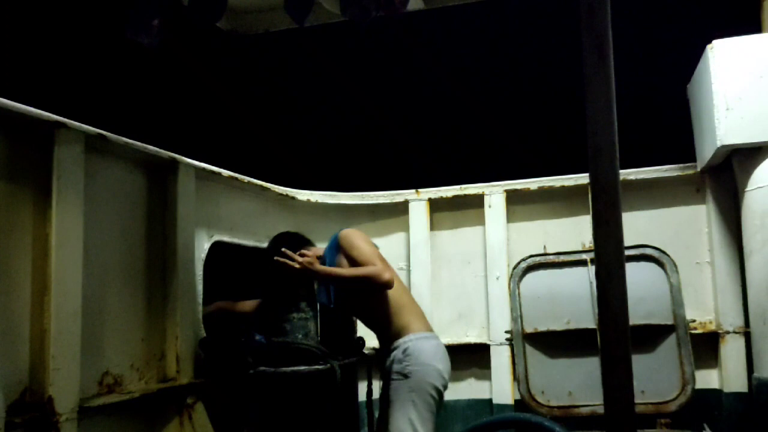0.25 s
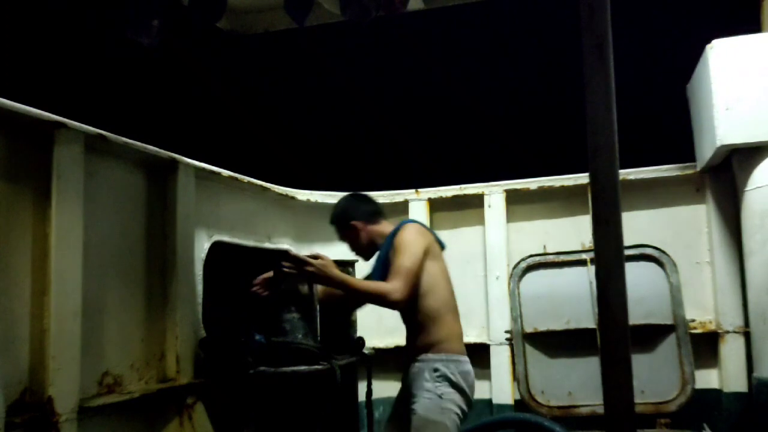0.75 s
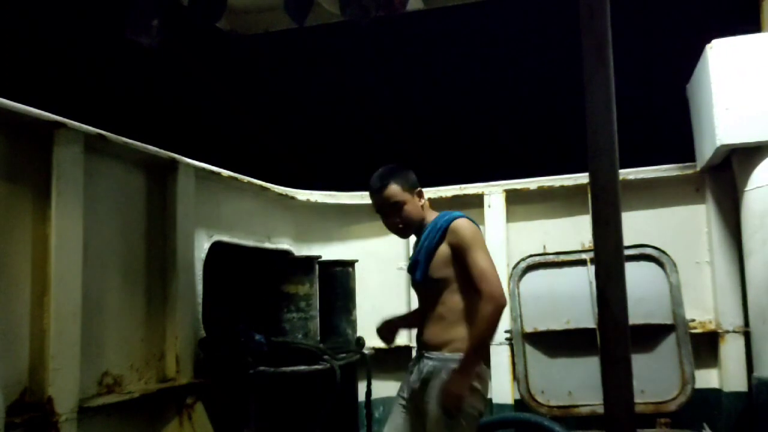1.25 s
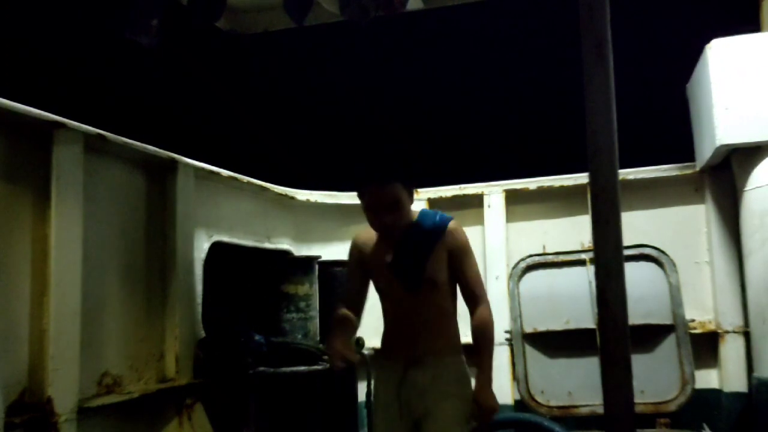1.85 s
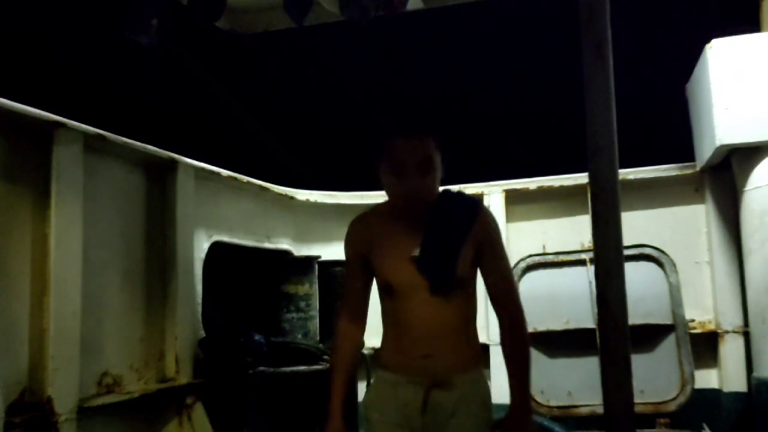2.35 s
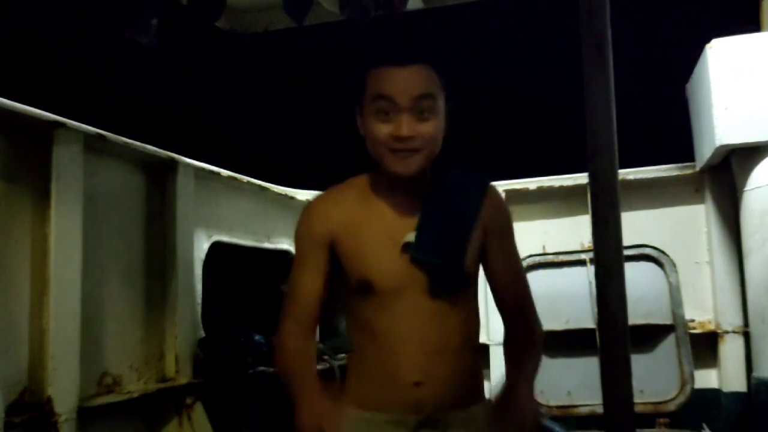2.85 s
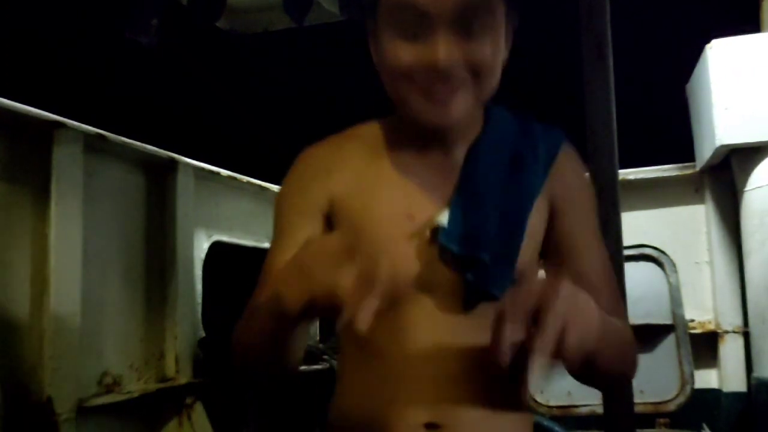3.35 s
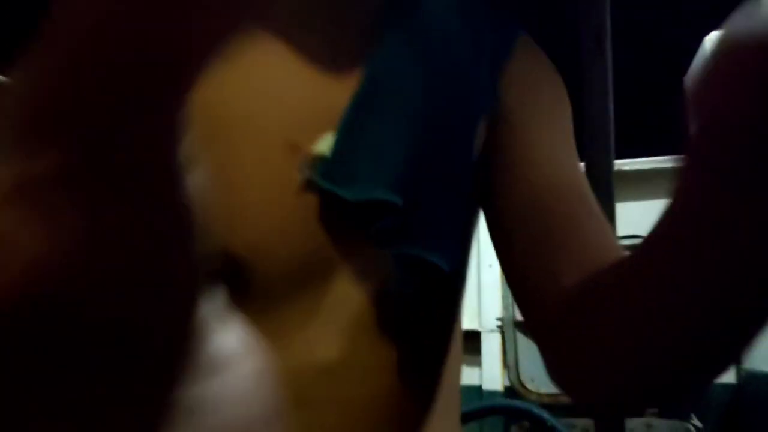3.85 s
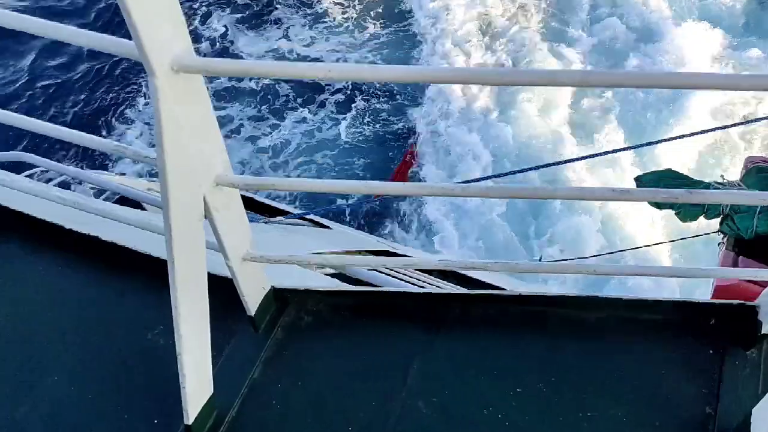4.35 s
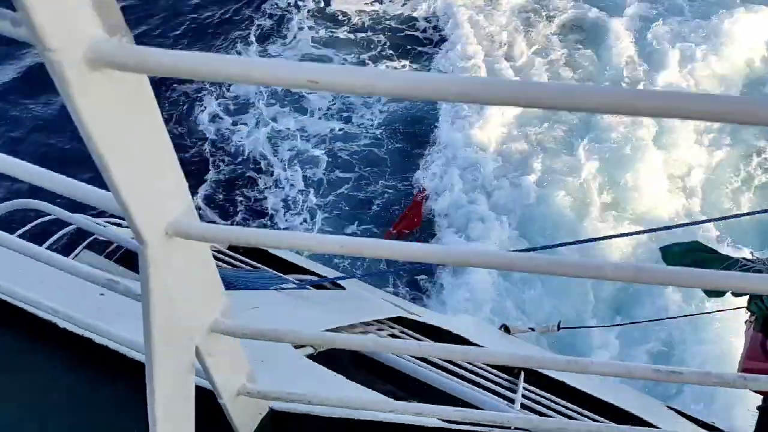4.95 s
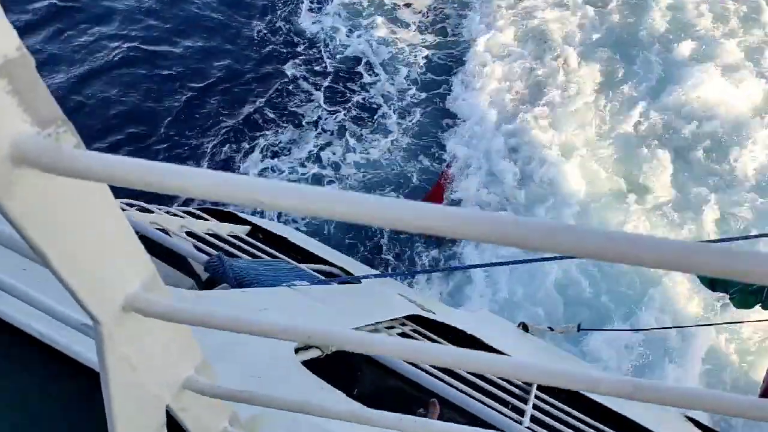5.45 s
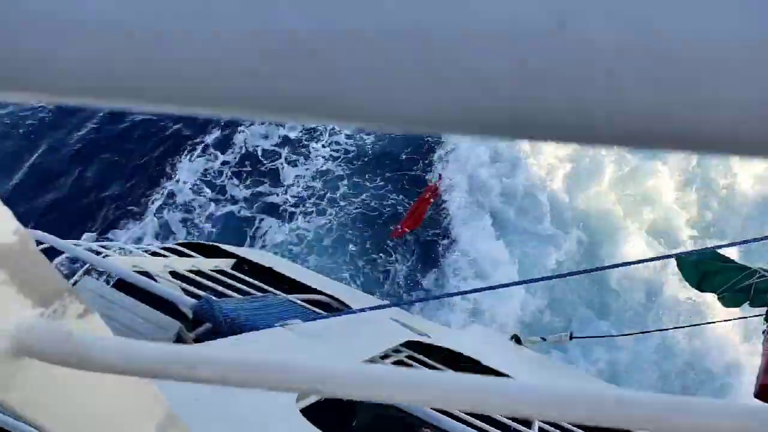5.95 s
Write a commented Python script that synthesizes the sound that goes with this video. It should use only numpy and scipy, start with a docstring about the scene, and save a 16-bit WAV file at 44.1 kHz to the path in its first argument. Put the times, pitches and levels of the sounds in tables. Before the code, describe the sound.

Aboard a ship, twin diesel engines drone inside a steel deck shelter with a dense, boomy roar and an unsteady mid-pitched blower whine. After about four seconds a hard cut moves to an open rail, where the roar thins, the engine hum is steadier and clearer, and the wake hisses below. Stereo handheld microphone, loud and close throughout.

```python
"""On a ship: a steel deck shelter first, then, after a hard cut, the open rail above the wake.
Twin diesels drone as sines at multiples (orders) of two slightly different engine cycles, which beat.
Roar and hissing wake are random short-time spectra, shaped by place and shared in part by the two ports.
In the shelter a blower sings over the roar as unsteady tones."""
import sys
import numpy as np
from scipy import signal
from scipy.io import wavfile
from scipy.ndimage import uniform_filter1d

SR = 44100
rng = np.random.default_rng(int(sys.argv[2]) if len(sys.argv) > 2 else 0)


def inscribe(sig):
    """Save sig as 16-bit PCM at rate SR to the path in sys.argv[1].

    A 1-D sig is mono; a 2-D sig holds one channel per row.
    Samples are clipped to [-1, 1] before scaling.
    """
    pcm = np.round(np.clip(np.atleast_2d(sig).T, -1, 1) * 32767)
    wavfile.write(sys.argv[1], SR, pcm.astype(np.int16))


N = 272538

# cycle rates of first and second engine
SHELTER_CYCLE_HZ, RAIL_CYCLE_HZ = (12.066, 12.29), (12.0425, 12.1925)


def gain_of(db):
    """dB to amplitude."""
    return 10 ** (np.asarray(db) / 20)


def evened(x):
    """Scaled to rms 1."""
    return x / np.sqrt(np.mean(x ** 2) + 1e-20)


def drift(top_hz):
    """Slow random curve of about rms 1: sines of random phase up to top_hz, weaker as they quicken."""
    coarse_s = np.arange(0, N + 256, 256) / SR
    slow = sum(np.sin(2 * np.pi * (f * coarse_s + rng.random())) / np.sqrt(f)
               for f in top_hz * np.geomspace(.05, 1, 20))
    return np.interp(np.arange(N) / SR, coarse_s, evened(slow))


def curves(rows):
    """Each column of a time table, interpolated at every sample."""
    s, *columns = np.transpose(rows)
    return [np.interp(np.arange(N) / SR, s, column) for column in columns]


def turning(hz):
    """Turns made by the speed curve hz from a random start."""
    return np.cumsum(hz * np.ones(N)) / SR + rng.random()


def tone(turns, db, same, pan_db=0.):
    """A cosine of rms db in two ports; lower likeness shifts the right port's phase."""
    ports = gain_of([[pan_db / 2], [-pan_db / 2]])
    angle = 2 * np.pi * turns
    right_shift = np.arccos(np.clip(same, -1, 1))
    return np.sqrt(2) * gain_of(db) * ports * np.cos([angle, angle + right_shift])


def beating(hz, beat_hz, peak_s, db, other_db, same=1.0):
    """Two tones beat_hz apart that add up in step at peak_s."""
    turns, beats = turning(hz), np.cumsum(beat_hz * np.ones(N)) / SR
    beats -= beats[round(peak_s * SR)]
    return tone(turns, db, same=1.0) + tone(turns + beats, other_db, same)


def bump(hz, centre_hz, width_hz):
    """A rounded resonance peak of height 1 across the bins hz."""
    return 1 / (1 + (2 * (hz[:, None] - centre_hz) / width_hz) ** 2)


NOTCH_WIDTH_HZ, LIFT_SHARE, LIFT_BELOW_HZ, LIFT_WIDTH_HZ = 140, 0.32, 530, 640
LOW_ROAR_HZ, LOW_ROAR_WIDTH_HZ = 200, 84


def roar(shape, modes, likeness, hiss, patchy_db, speckle_db, flicker_db, hiss_from_hz,
         notch=((0, 1, 0),), low=((0, 0),)):
    """Broadband noise from random spectra with wide patches and narrow speckle, raised at the air modes."""
    frames, hz = N // 512 + 5, np.fft.rfftfreq(2048, 1 / SR)
    at = np.minimum(np.arange(frames) * 512, N - 1)
    a, b, c, d, patches, speckle = rng.standard_normal((frames, 1025, 6)).T
    patches = evened(uniform_filter1d(uniform_filter1d(patches, size=30, axis=0), size=4, axis=1))
    speckle = evened(uniform_filter1d(uniform_filter1d(speckle, size=3, axis=0), size=6, axis=1))

    # the right port shares part of the left port's noise
    same_hz, same = np.transpose(likeness)
    same = np.clip(np.interp(np.log(hz + 1), np.log(same_hz), same), -1, 1)[:, None]
    left, other = a + 1j * b, c + 1j * d
    z = np.array([left, same * left + np.sqrt(1 - same ** 2) * other])

    shape_hz, *shape_db = np.transpose(shape)
    ports_db = np.array([np.interp(np.log(hz + 1), np.log(shape_hz), db, left=-90) for db in shape_db])
    ports_db = ports_db[:, :, None] + sum(db * bump(hz, mode_hz, width_hz) for mode_hz, width_hz, db in modes)

    treble = (1 / (1 + (hiss_from_hz / (hz + 1)) ** 2))[:, None]
    hiss_db = (curves(hiss)[0] + flicker_db * drift(30.))[at]
    uneven_db = patchy_db * patches + np.sqrt(treble) * speckle_db * speckle
    z *= gain_of(ports_db + uneven_db + treble * hiss_db)

    # a moving notch, with the opposite change below it
    notch_hz, notch_db = (curve[at] for curve in curves(notch))
    notch_shape = bump(hz, notch_hz, NOTCH_WIDTH_HZ)
    notch_shape = notch_shape - LIFT_SHARE * bump(hz, notch_hz - LIFT_BELOW_HZ, LIFT_WIDTH_HZ)
    low_db = curves(low)[0][at] * bump(hz, LOW_ROAR_HZ, LOW_ROAR_WIDTH_HZ)
    z *= gain_of(notch_db * notch_shape + low_db)
    per_hz = np.sqrt(SR / 2048)  # level per Hz to level per bin
    return per_hz * signal.istft(z, nperseg=2048, noverlap=1536)[1][:, :N]


# Roar of exhaust, air and steel. Each row: Hz, left dB per Hz, right dB per Hz.
SHELTER_ROAR = [(20, -59, -58), (60, -43, -45), (107, -49.5, -51), (144, -43, -43.5), (202, -38.5, -40.5),
                (319, -41.5, -42.5), (446, -48, -48.5), (540, -49.5, -53), (720, -47, -48),
                (993, -46, -54.5), (1283, -53.5, -57), (1455, -62.5, -61), (2340, -63, -65.5),
                (2440, -69.5, -67), (3700, -75, -75), (5200, -76, -70.5), (6450, -77.5, -74.5),
                (7620, -76.5, -62.5), (8460, -71.5, -76), (8940, -69, -74.5), (9820, -84.5, -87.5),
                (11900, -94, -93.5), (14600, -100, -101), (15300, -114, -112)]
# Air modes of the steel shelter. Each row: Hz, width in Hz, dB.
SHELTER_MODES = [(148, 13, 6.5), (272, 13, 3.5), (328, 24, 3), (390, 16, 3), (458, 25, 7), (498, 10, 5),
                 (752, 32, 3), (855, 30, 2.5), (1048, 27, 4.5), (1310, 30, 2.5), (1750, 82, 3.5)]
# Port likeness of the roar. Each row: Hz, left-right likeness (-1 to 1).
SHELTER_SAME = [(30, .7), (60, .74), (100, .76), (150, .74), (200, .64), (300, .7), (455, .88), (520, .45),
                (650, .55), (900, .15), (1250, .15), (1550, -.4), (1850, 0), (2150, .05), (2350, .42),
                (2650, 0), (3250, -.15), (3700, .13), (14800, .05)]
# Brightness of the air. Each row: time in seconds, treble change in dB.
SHELTER_HISS = [(0, -.8), (1, -2.2), (2, -1.3), (2.8, -1.3), (2.95, .8), (3.5, -.9), (3.95, .5),
                (4.25, 2.5)]
# Moving notch late in the shelter. Each row: time in seconds, centre in Hz, change in dB.
NOTCH = [(3.95, 1453, 2), (4.03, 1550, -4), (4.12, 1850, -3), (4.2, 2075, -8), (4.26, 2050, -5)]
# Low roar. Each row: time in seconds, change in dB.
LOW_ROAR = [(0, 2.5), (.45, 1.5), (.75, -3), (1.2, -2.5), (1.7, 1), (2.5, 1.5), (3.1, -.6), (3.6, -1.2),
            (4.25, 3.5)]


def shelter_roar():
    """Steel walls hold a dense roar whose low part swells and sinks; a notch moves through its end."""
    return roar(SHELTER_ROAR, SHELTER_MODES, SHELTER_SAME, SHELTER_HISS, patchy_db=.9, speckle_db=4.4,
                flicker_db=.3, hiss_from_hz=1500, notch=NOTCH, low=LOW_ROAR)


# Roar and wake at the rail. Each row: Hz, left dB per Hz, right dB per Hz.
RAIL_ROAR = [(20, -57, -57), (60, -48, -48), (115, -60, -60), (159, -48.5, -49), (220, -56, -56.5),
             (285, -52, -52.5), (456, -50, -55), (537, -56.5, -57), (700, -53, -57), (1290, -63.5, -63.5),
             (2090, -65.5, -65), (4230, -70.5, -69.5), (5930, -71, -69), (7700, -62.5, -59.5),
             (8640, -57, -69), (9230, -64.5, -78), (10460, -93, -89), (11100, -85.5, -90),
             (14000, -81, -97), (14600, -139, -137), (15300, -140, -140)]
# Air modes of the deck by the rail. Each row: Hz, width in Hz, dB.
RAIL_MODES = [(262, 14, 2), (296, 24, 4), (435, 24, 3), (485, 14, 3), (660, 25, 3), (705, 30, 3),
              (1030, 40, 3), (1250, 20, 4)]
# Port likeness of roar and wake. Each row: Hz, left-right likeness (-1 to 1).
RAIL_SAME = [(30, .94), (180, .93), (300, .86), (450, .62), (1100, .38), (1300, .24), (2000, .32),
             (2250, -.1), (2600, .06), (3300, -.18), (4200, .16), (4800, -.18), (5200, 0), (14800, -.05)]
# Brightness of the air. Each row: time in seconds, treble change in dB.
RAIL_HISS = [(4.25, -2.5), (4.6, -2.2), (5, -0.3), (5.5, -0.6), (5.9, -0.5), (6.18, -0.2)]


def rail_roar_and_wake():
    """A thinner roar in open air, with the wake's hiss as its treble."""
    return roar(RAIL_ROAR, RAIL_MODES, RAIL_SAME, RAIL_HISS, patchy_db=.6, speckle_db=4.2,
                flicker_db=.4, hiss_from_hz=1500)


# Blower and machinery tones. Each row: mean Hz, mean dB, wavering in dB rms, left-right likeness.
TONES = [(291.0, -37, 1.5, .8), (630.5, -42, 1.5, .8), (872.1, -38, 1.2, .5), (2326, -49, 2, .3),
         (5023, -61, 1.5, .1), (5615, -61, 1.5, .1), (10810, -75, 1.5, .1)]
# Strongest blower tones. Each row: time in seconds, whine dB, upper pair dB.
BLOWER = [(0, -22, -31.5), (.8, -19, -31.5), (1.5, -20.5, -29.5), (1.85, -20.5, -39), (2.3, -19, -33),
          (2.7, -19, -32.5), (3.3, -22.5, -37), (3.65, -18.5, -32.5), (4.25, -24, -35.5)]
WHINE_HZ, PAIR_HZ, PAIR_OFFSET_DB = 436.15, (654.7, 663.4), (-2, 0)


def blower():
    """Blower and machinery tones share one unsteady speed; each wavers in level on its own."""
    unsteady = 1 + .0012 * drift(6.)
    sing = sum(tone(turning(hz * unsteady), db + waver_db * drift(25.), same)
               for hz, db, waver_db, same in TONES)
    whine_db, pair_db = curves(BLOWER)
    sing += tone(turning(WHINE_HZ * unsteady), whine_db + 1.6 * drift(40.), same=.995)
    for hz, offset_db in zip(PAIR_HZ, PAIR_OFFSET_DB):
        sing += tone(turning(hz * unsteady), pair_db + offset_db + .7 * drift(15.), same=.99)
    return sing


# Strongest low tones. Each row: time in seconds, 4th order dB, 12th order dB, dB of the tone just above it.
SHELTER_HUM = [(0.0, -21.5, -23.5, -28), (0.45, -25, -17, -26), (0.7, -26, -25.5, -26),
               (1.0, -27, -21.5, -47), (1.4, -28, -22.5, -54), (1.9, -24, -17.5, -43), (2.5, -28, -28, -32),
               (2.8, -35, -15, -29), (3.15, -21, -19, -48), (3.55, -31, -17, -18), (3.9, -21, -24.5, -21),
               (4.25, -26, -21.5, -39)]
# Pair at the 6th order. Each row: time in seconds, beat rate in Hz, dB of the upper tone, which holds its pitch.
SHELTER_BEAT = [(0.0, 1.26, -28.5), (1.4, 2, -29.5), (2.3, 1.98, -26), (2.6, 2.2, -25), (3.5, 1.01, -32),
                (4.25, 0.83, -25.5)]
NEIGHBOUR_BEAT_HZ, NEIGHBOUR_PEAK_S = 5.3, .14
SECOND_DB, GLIDING_OFFSET_DB, SIXTH_PEAK_S = -29.5, -2, 0.29


def shelter_hum():
    """Low engine orders swell and sink; the 6th and 12th each beat with a tone close by."""
    fourth_db, twelfth_db, neighbour_db = curves(SHELTER_HUM)
    beat_hz, sixth_db = curves(SHELTER_BEAT)
    first_hz, second_hz = SHELTER_CYCLE_HZ
    second_order = tone(turning(2 * first_hz), SECOND_DB + 1.5 * drift(2.5), same=.99)
    fourth = tone(turning(4 * first_hz), fourth_db + 1.8 * drift(5.), same=.99)
    sixth = beating(6 * second_hz, -beat_hz, SIXTH_PEAK_S, sixth_db, sixth_db + GLIDING_OFFSET_DB, same=.9)
    twelfth = beating(12 * first_hz, NEIGHBOUR_BEAT_HZ, NEIGHBOUR_PEAK_S,
                      twelfth_db + 1.1 * drift(13.0), neighbour_db)
    return second_order + fourth + sixth + twelfth


# Hum at the rail. Each row: time in seconds, 4th order dB, 24th order dB.
RAIL_HUM = [(4.26, -21, -24), (4.6, -17.5, -23.5), (4.9, -22.5, -27), (5.2, -21.5, -28), (5.7, -20.5, -25),
            (5.9, -28, -30.5), (6.18, -33, -26)]
FIFTEENTH_DB, FIFTEENTH_BEAT_HZ, FIFTEENTH_PEAK_S = (-27.5, -28.5), 2.78, 5.085
SIXTH_START_DB, RAIL_SIXTH_PEAK_S, SIXTH_BEAT_HZ, SIXTH_SINKS_DB_PER_S = (-27, -28.5), 5.29, 0.81, 7


def rail_hum():
    """Strong engine orders; the 6th and 15th beat with a tone close by, and the 6th sinks after its peak."""
    first_hz, second_hz = RAIL_CYCLE_HZ
    fourth_db, upper_db = curves(RAIL_HUM)
    fourth = tone(turning(4 * first_hz), fourth_db, same=1.0)
    upper_turns = turning(24 * first_hz) + .04 * drift(4.)
    upper = tone(upper_turns, upper_db + 1.4 * drift(12.), same=.98, pan_db=0.3)
    fifteenth = beating(15 * second_hz, -FIFTEENTH_BEAT_HZ, FIFTEENTH_PEAK_S, *FIFTEENTH_DB)
    since_peak_s = np.maximum(np.arange(N) / SR - RAIL_SIXTH_PEAK_S, 0)
    sixth = beating(6 * first_hz, SIXTH_BEAT_HZ, RAIL_SIXTH_PEAK_S, *SIXTH_START_DB)
    return fourth + upper + fifteenth + gain_of(-SIXTH_SINKS_DB_PER_S * since_peak_s) * sixth


def engines(cycle_hz, in_step_s, orders, wander_turns, waver_db, apart_hz, pan_db):
    """Each engine's orders are locked to its slightly wandering crank; the two cranks beat."""
    since_s = np.arange(N) / SR - in_step_s
    cranks = [hz * since_s + wander * drift(1.516) for hz, wander in zip(cycle_hz, wander_turns)]
    # each order gets a random phase offset, the same for both engines, so the throb is softer
    offsets_turns = rng.random() + .22 * rng.standard_normal(len(orders))
    total = 0
    for (order, *levels_db), offset in zip(orders, offsets_turns):
        for hz, crank, db in zip(cycle_hz, cranks, levels_db):
            pitch = order * hz / apart_hz  # ports differ more as pitch rises
            total = total + tone(order * crank + offset, db + waver_db * drift(6.),
                                 same=1 - pitch ** 6, pan_db=pan_db * pitch ** 3)
    return total


# Engine orders in the shelter. Each row: multiple of the engine cycle, first engine dB, second engine dB.
SHELTER_ORDERS = [(3, -48, -35), (5, -41, -38), (8, -35, -35), (10, -38, -38), (14, -29, -32),
                  (15, -40, -38), (16, -33, -38), (17, -33, -42), (18, -35, -39), (20, -43, -35),
                  (27, -42, -39)]


def shelter_engines():
    """Both engines' orders between steel walls, wavering widely in level."""
    return engines(SHELTER_CYCLE_HZ, in_step_s=2.07, orders=SHELTER_ORDERS, wander_turns=(.006, .012),
                   waver_db=4.0, apart_hz=600, pan_db=18)


# Engine orders at the rail. Each row: multiple of the engine cycle, first engine dB, second engine dB.
RAIL_ORDERS = [(2, -38, -44), (8, -40, -46), (10, -48, -50), (12, -38, -29), (13, -42, -40),
               (14, -28.5, -30.5), (16, -41, -29.5), (17, -50, -40), (18, -31.5, -33.5), (23, -43, -46),
               (25, -44, -48), (26, -37, -33), (27, -48, -46), (28, -49, -38), (29, -50, -43),
               (31, -44, -50), (34, -37, -50), (35, -43, -41), (36, -48, -42), (38, -29.5, -43),
               (39, -44, -48)]


def rail_engines():
    """Exhaust orders in open air, steadier and clear of the roar."""
    return engines(RAIL_CYCLE_HZ, in_step_s=5.22, orders=RAIL_ORDERS, wander_turns=(.002, .002),
                   waver_db=1.5, apart_hz=560, pan_db=10.5)


CUT_S, SHELTER_FADE_S, RAIL_FADE_S = 4.2535, 0.0019, 0.01


def scene():
    """The shelter fades out within 2 ms up to the cut; the rail fades in over 10 ms after it."""
    since_cut_s = np.arange(N) / SR - CUT_S
    shelter = shelter_roar() + blower() + shelter_hum() + shelter_engines()
    rail = rail_roar_and_wake() + rail_hum() + rail_engines()
    shelter_gain = np.clip(-since_cut_s / SHELTER_FADE_S, 0, 1)
    rail_gain = np.clip(since_cut_s / RAIL_FADE_S, 0, 1)
    return shelter * shelter_gain + rail * rail_gain


EDGE_HZ = 15385


def record(dry):
    """The loudest peaks round off softly near full scale; then a low-pass limits the band."""
    knee = 1.1
    rounded = dry / (1 + np.abs(dry / knee) ** 6) ** (1 / 6)
    low_pass = signal.firwin(511, EDGE_HZ, window=("kaiser", 9), fs=SR)
    return signal.oaconvolve(rounded, low_pass[None], "same")


dry = scene()
out = record(dry)
inscribe(out)
```